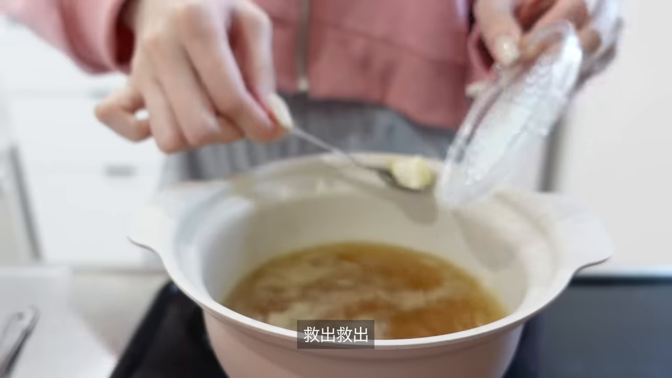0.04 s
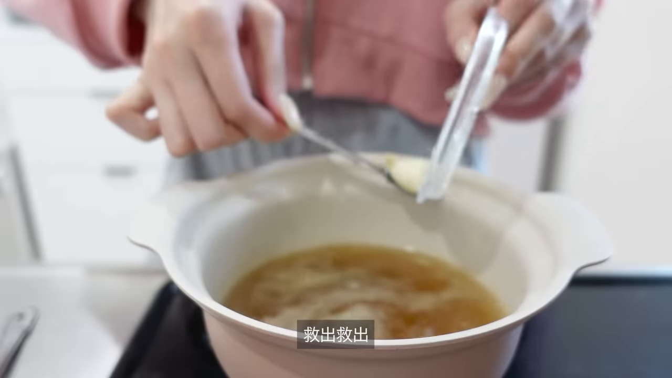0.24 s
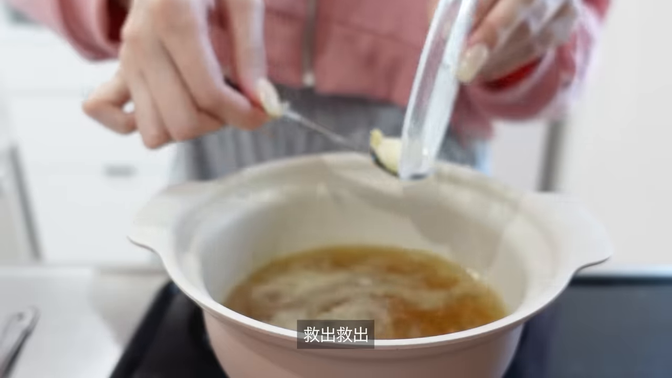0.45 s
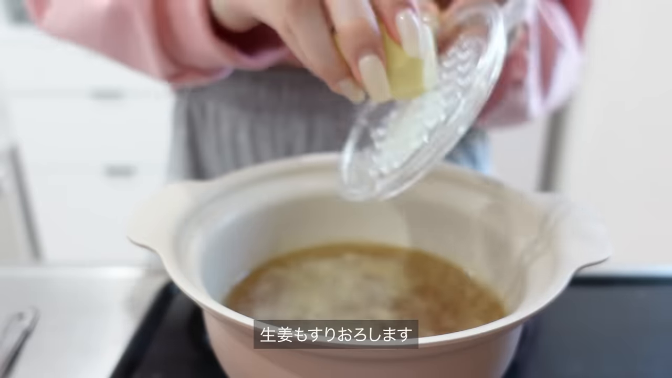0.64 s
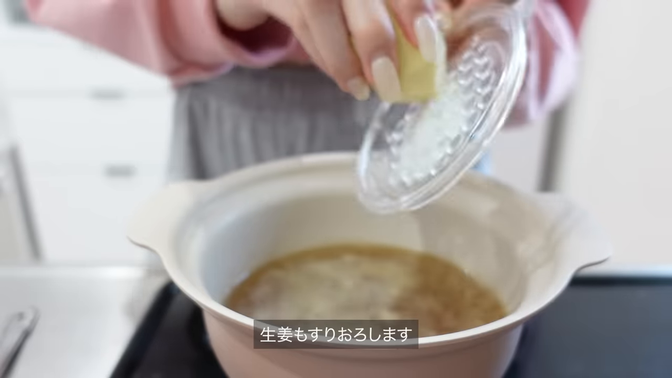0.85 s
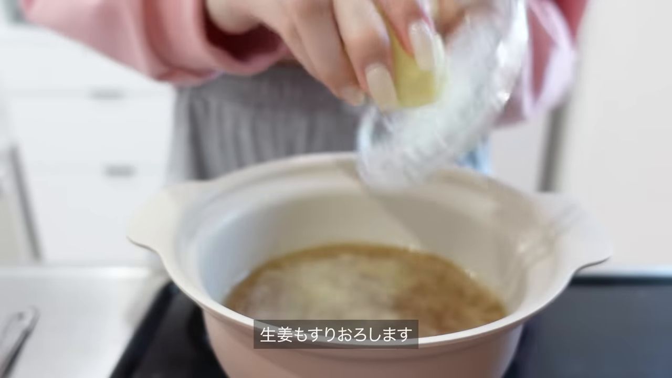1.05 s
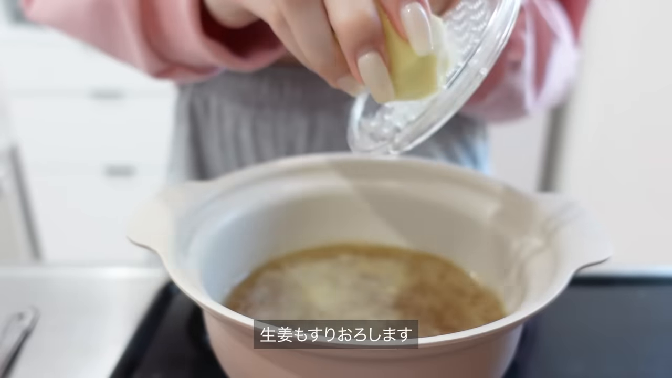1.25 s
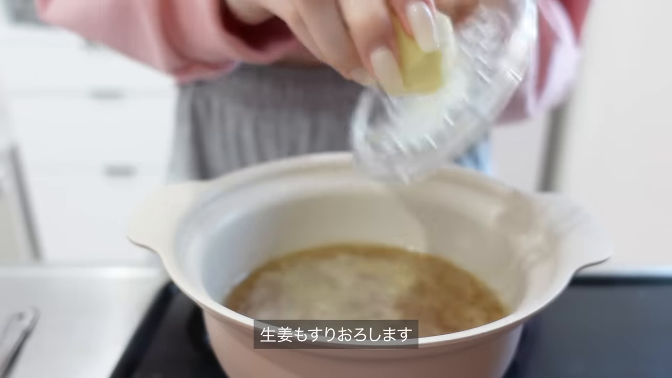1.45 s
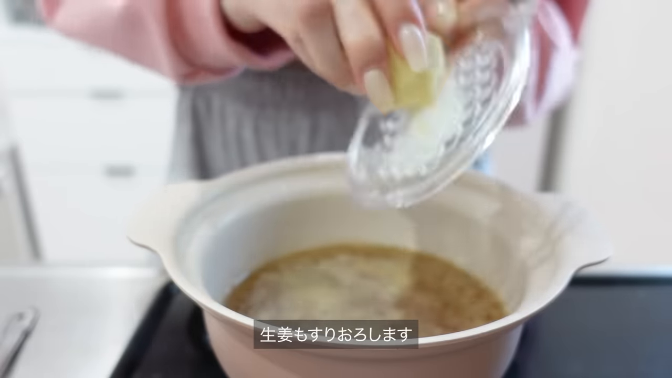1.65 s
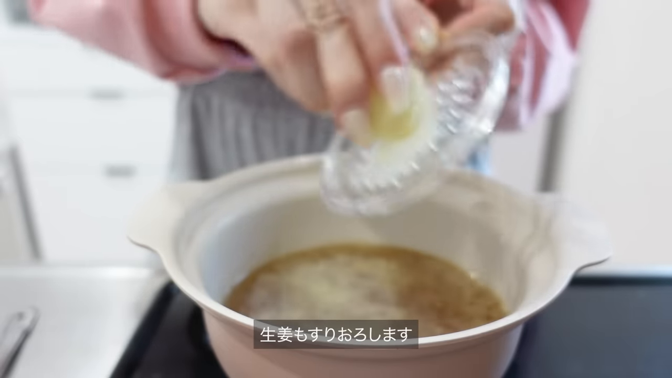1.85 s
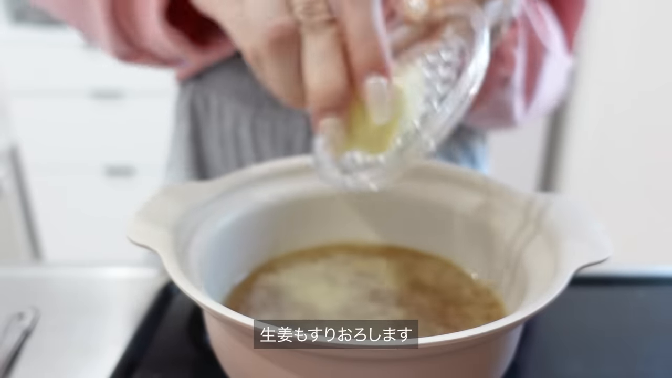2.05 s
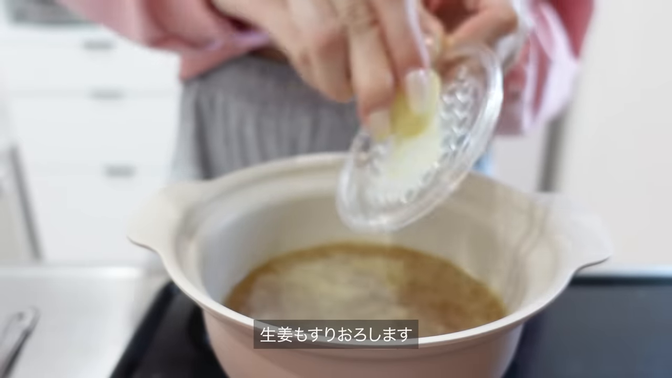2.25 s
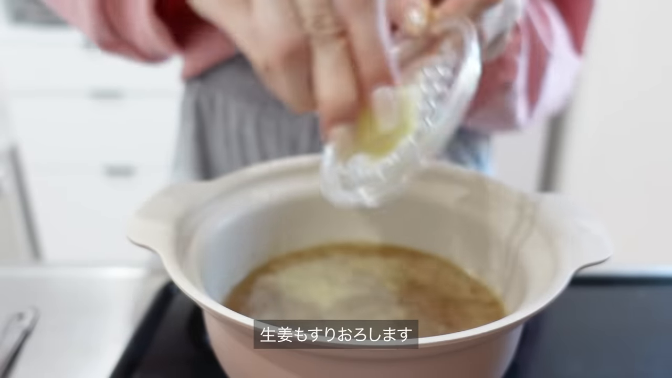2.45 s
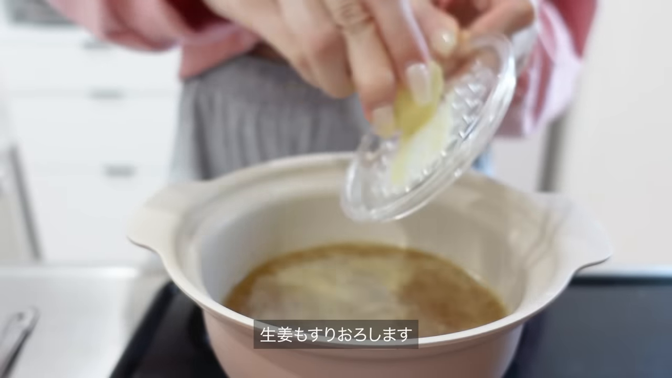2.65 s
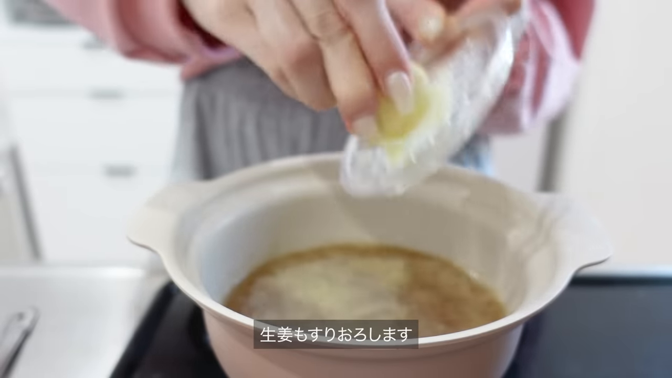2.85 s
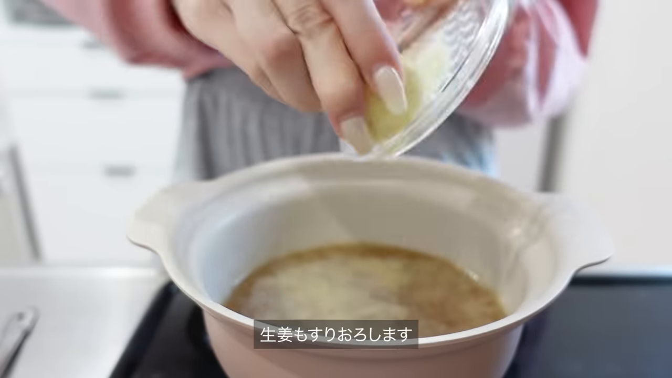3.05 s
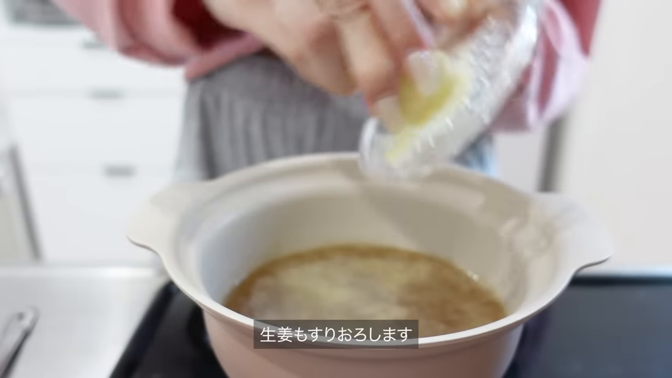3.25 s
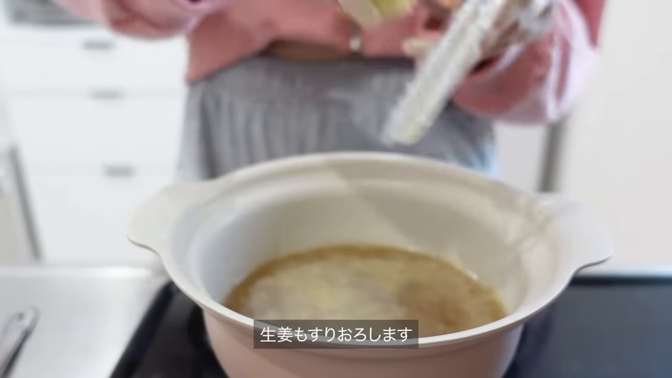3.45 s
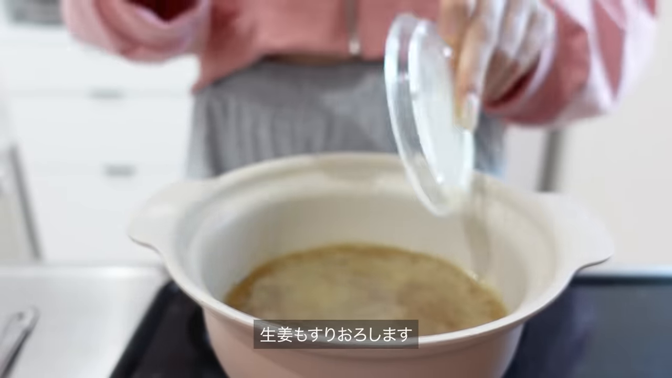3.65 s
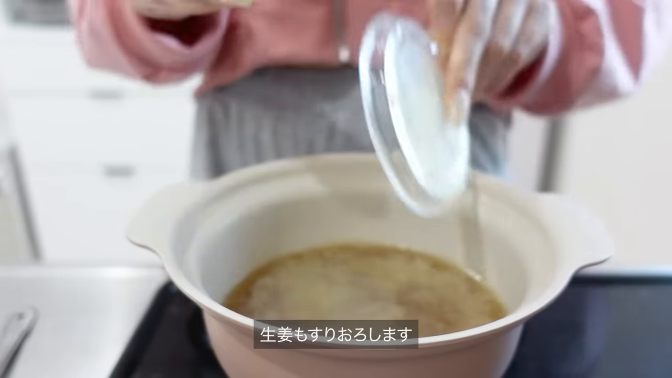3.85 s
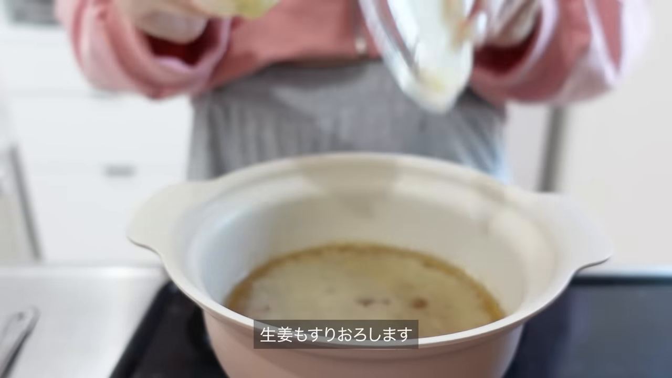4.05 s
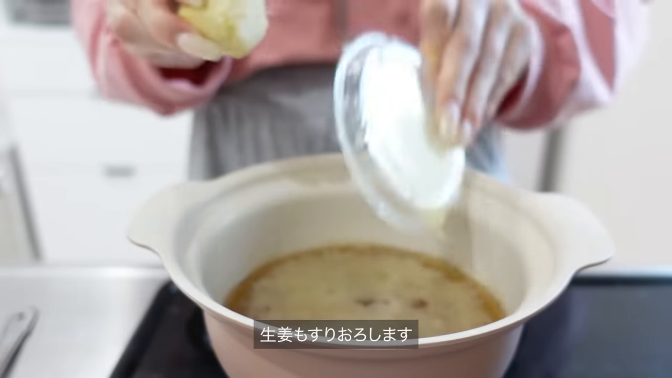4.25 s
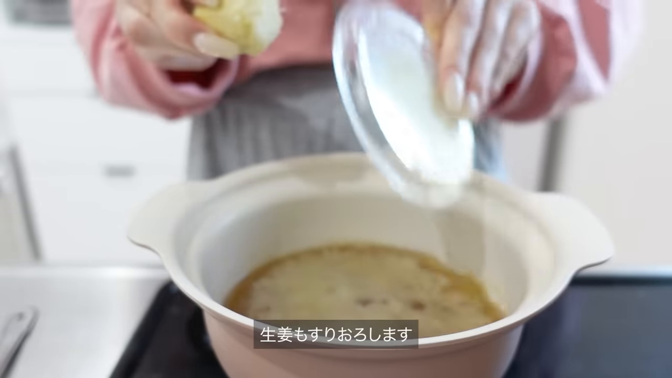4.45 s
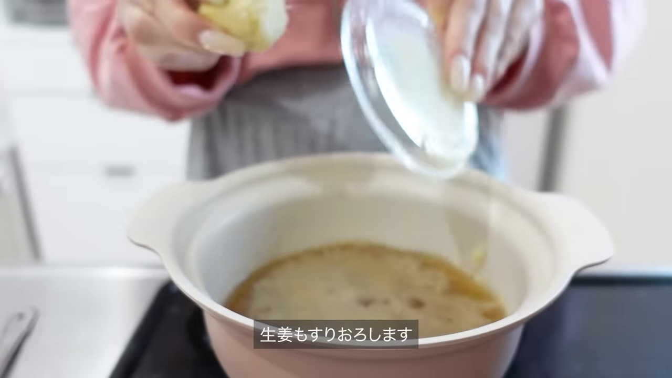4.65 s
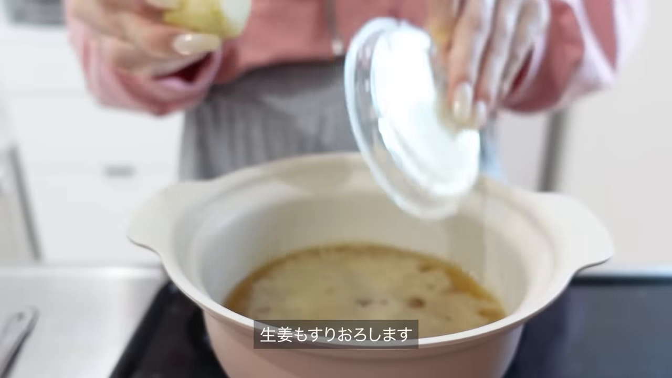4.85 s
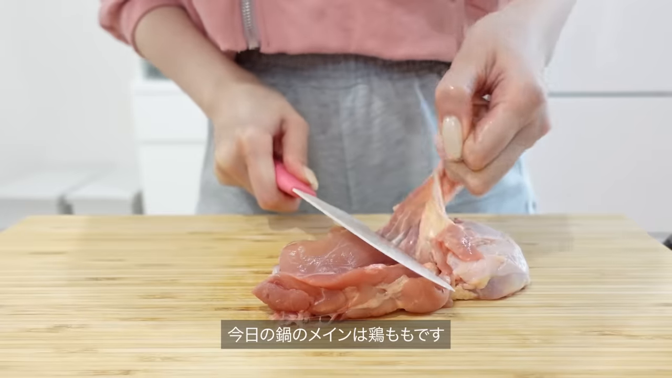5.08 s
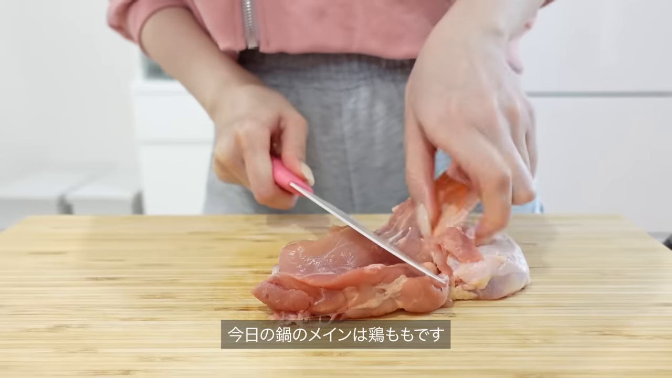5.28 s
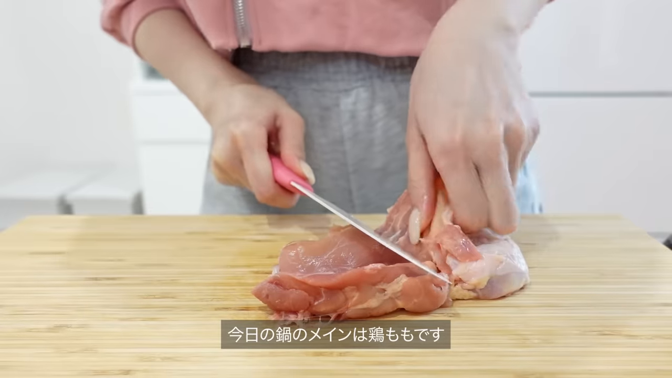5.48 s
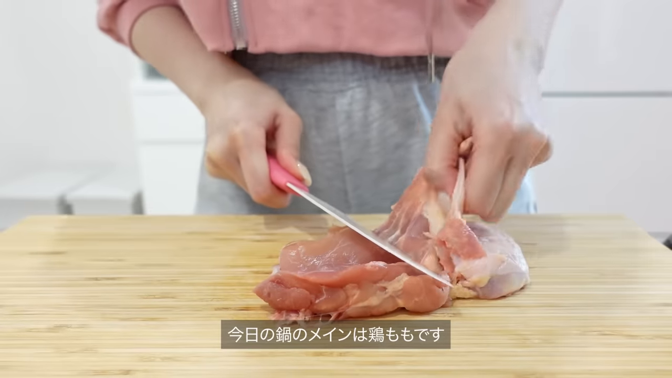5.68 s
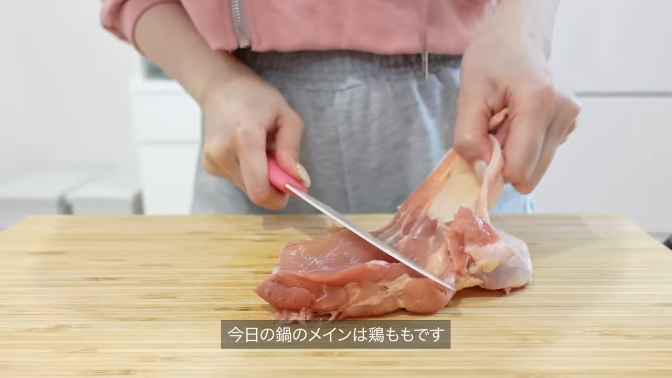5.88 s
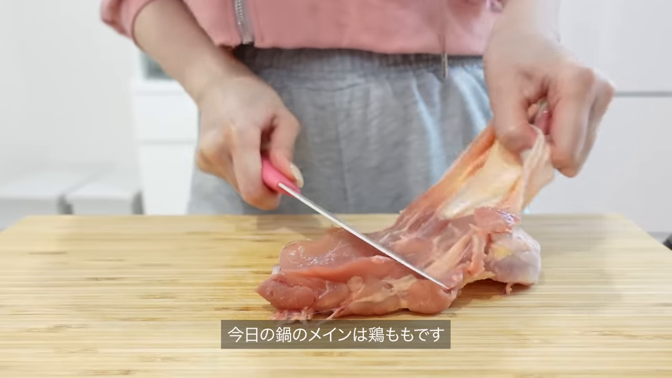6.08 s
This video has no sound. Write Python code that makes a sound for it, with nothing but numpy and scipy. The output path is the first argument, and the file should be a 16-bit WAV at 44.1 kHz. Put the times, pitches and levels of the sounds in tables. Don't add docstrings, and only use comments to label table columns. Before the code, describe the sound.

A spoon scrapes glass, then ginger rasps in quick strokes on a ribbed glass grater, ringing knocks hit a ceramic pot, and raw meat faintly crackles.

```python
import sys
import numpy as np
from scipy import signal
from scipy.fft import rfft, irfft
from scipy.io import wavfile
from scipy.ndimage import uniform_filter1d

SR = 44100
rng = np.random.default_rng(int(sys.argv[2]) if len(sys.argv) > 2 else 0)


def generate_wav(signal):
    frames = np.transpose(np.atleast_2d(signal))
    scaled = np.clip(frames, -1, 1) * 32767
    pcm = np.round(scaled).astype(np.int16)
    wavfile.write(sys.argv[1], SR, pcm)


def voltage_ratio(level):
    return 10 ** (np.asarray(level, float) / 20)


N = 269886
T = np.arange(N) / SR
NORMAL, FAST = 1, 1.771


def evened(x):
    return x / np.sqrt(np.mean(x ** 2) + 1e-20)


def read(points, hz):
    f, value = np.transpose(points)
    return np.interp(np.log(hz + 1), np.log(f + 1), value)


def smooth_noise(*sizes):
    x = rng.standard_normal(N)
    for size in sizes:
        x = uniform_filter1d(x, size=size)
    return evened(x)


def highpass(x, order, hz):
    return signal.sosfilt(signal.butter(order, hz, "high", fs=SR, output="sos"), x)


CUTS_S = [0, .7025, 1.942, 4.074, 4.94, 6.2]


def shot(index, fade_s=0.00058):
    inside_s = np.minimum(T - CUTS_S[index], CUTS_S[index + 1] - T)
    return np.clip(inside_s / fade_s + (index == 0), 0, 1)


def colour(x, db_at, size):
    overlap = size * 3 // 4
    hz, t, z = signal.stft(x, SR, nperseg=size, noverlap=overlap)
    z = z * voltage_ratio(db_at(hz[:, None], t))
    return signal.istft(z, SR, nperseg=size, noverlap=overlap)[1][..., :x.shape[-1]]


def grit(shape, per_s, spread_db, smooth):
    size = voltage_ratio(spread_db * np.minimum(rng.exponential(1, shape), 2.5))
    clicks = size * rng.choice([-1., 1.], shape) * (rng.random(shape) < per_s / SR)
    return evened(evened(clicks) + smooth * rng.standard_normal(shape))


def resonate(x, hz, width_hz):
    turn = np.exp(2j * np.pi * np.cumsum(hz * np.ones(x.shape[-1])) / SR)
    r = np.exp(-np.pi * width_hz / SR)
    return 2 * (turn * signal.lfilter([1 - r], [1, -r], x / turn)).real


def pair(left, other, lean_db):
    return np.array([left + other, left - other]) * voltage_ratio(np.array([[-lean_db], [lean_db]]) / 2)


def narrow(x, hz):
    mid = (x[0] + x[1]) / 2
    side = signal.lfilter(*signal.butter(1, hz, "high", fs=SR), (x[0] - x[1]) / 2)
    return np.array([mid + side, mid - side])


def room(x, t60_s, wet_db):
    t = np.arange(SR // 2) / SR
    noise = rng.standard_normal((2, len(t)))
    tail = colour(noise, lambda hz, s: -60 * s / t60_s * (1 + hz / 14000), size=256)
    tail *= t > .004
    tail = tail / np.linalg.norm(tail[0])
    return voltage_ratio(wet_db) * signal.fftconvolve(x[None], tail, axes=1)[:, :N]


def swells(t, rows, rest_db):
    return voltage_ratio(rest_db) + sum(voltage_ratio(db) * np.exp(-((t - s) / half) ** 2) for s, db, half, *_ in rows)


def contacts(rows, width_share, snap):
    out, t = np.zeros(N), T[:3000]
    for s, db, hz, t60_s in rows:
        noise = rng.standard_normal(len(t))
        ring = evened(resonate(noise, hz, width_share * hz)) * voltage_ratio(-60 * t / max(t60_s, .003))
        pop = 4 * np.sin(2 * np.pi * hz * t)
        burst = (np.diff(noise, prepend=0) + pop) * np.exp(-t / 0.00061)
        part = out[round(s * SR):][:len(t)]
        part += (voltage_ratio(db - 8.0) * (ring + snap * burst))[:len(part)]
    return out


# (frequency [Hz], density [dB per Hz])
TONES = [
    [(24, -57), (40, -31), (177, -13), (438, -16.5), (497, -15.5), (673, -15.5), (981, -18.5),
     (2200, -21.5), (16500, -40.5)],
    [(24, -57.5), (40, -49), (145, -1.5), (271, -6.5), (417, -3.5), (1090, -6.5), (9480, -7),
     (15300, -20.5), (16500, -45)],
    [(24, -56.5), (40, -30), (156, -10), (461, -15), (564, -14.5), (1940, -22.5), (2970, -22), (13500, -62),
     (16500, -53)],
]
TONE_DB = [-60.5, -59, -52, -62]
# (frequency [Hz], correlation [0-1])
TONE_SAME = [(60, 0.93), (240, 0.84), (950, 0.1), (3770, 0.45), (15000, 1)]
# (frequency [Hz], width [Hz], level [dB])
WHINES = [(2110, 64, -77.5), (2600, 30, -80)]
HUM_ON_S, HUM_OFF_S, HUM_SWELL_S = 5.17, 5.92, 0.056
HUM_DB, HUM_BEFORE_DB, HUM_AFTER_DB, UPPER_HUM_DB = -64.5, -77, -70, -70


def room_tone():
    hz, out = np.fft.rfftfreq(N, 1 / SR), 0
    same = np.clip(read(TONE_SAME, hz), -1, 1)
    takes = [(TONES[0], NORMAL, [0, 1]), (TONES[0], FAST, [2]), (TONES[1], NORMAL, [3]), (TONES[2], NORMAL, [4])]
    for (tone, speed, shots), db in zip(takes, TONE_DB):
        a, b = rfft(rng.standard_normal((2, N)))
        z = np.array([a, same * a + np.sqrt(1 - same ** 2) * b]) * voltage_ratio(read(tone, hz / speed))
        z = z / (1 + (80 * (speed - 1) * 1.9 / (hz + 1)) ** 4)
        out = out + voltage_ratio(db) * evened(irfft(z, N)) * sum(shot(k) for k in shots)
    corners_s = [HUM_ON_S - HUM_SWELL_S, HUM_ON_S + HUM_SWELL_S,
                 HUM_OFF_S - HUM_SWELL_S / 2, HUM_OFF_S + HUM_SWELL_S / 2]
    low_db = np.interp(T, corners_s, [HUM_BEFORE_DB, HUM_DB, HUM_DB, HUM_AFTER_DB])
    low_hz = 146 + 1.75 * smooth_noise(1800)
    low = np.sqrt(2) * np.sin(2 * np.pi * np.cumsum(low_hz) / SR) * voltage_ratio(2.0 * smooth_noise(1500))
    upper = evened(resonate(rng.standard_normal(N), 326.5, 13.0))
    hum = voltage_ratio(low_db) * low + voltage_ratio(UPPER_HUM_DB) * upper
    for f, width_hz, db in WHINES:
        hum = hum + voltage_ratio(db) * evened(resonate(resonate(rng.standard_normal(N), f, width_hz), f, 300))
    return out + hum * shot(4)


# (centre [s], scrape [dB], half length [s])
SPOON = [
    (0.104, -58, 0.019),
    (0.278, -48, 0.02),
    (0.336, -61, 0.012),
]
RING_HZ = [
    [604, 2184, 255, 480],
    [3277, 3555, 3660],
    [3882],
    [5300, 5479, 5020, 4673, 4813, 5910, 7030, 7456, 8339, 9125, 9380, 10400, 11280, 4763, 6717, 8172],
]
# (t60 [s], slow knock [dB], fast knock [dB], spoon [dB])
RINGS = [
    [(0.092, 1.5, -1, -9), (0.14, -1.5, -12, 4), (0.11, -6, -7, -2.5), (0.1, -7, -5.5, -16)],
    [(.19, -1, -6, -19), (.5, -3, -11.5, -7), (.5, -4.5, -3, 1.5)],
    [(1.1, -0.5, -2.5, -4)],
    [(0.21, 1.5, -3.5, -11), (0.5, -12, -40, -1.5), (0.36, -15, -5, -11), (0.25, -16.5, -10, 0),
     (0.22, -12, -6, -3), (0.28, -23, -22, -5), (0.12, -9.5, -25, 2), (0.23, -17, -9.5, 1.5),
     (0.15, -15, -18, -7), (0.18, -11, -42.5, -6), (0.11, -10.5, -40, -12), (0.113, -16, -50, -9),
     (0.1, -14, -50, -24), (0.2, -21, -9, -30), (.2, -29.5, -18, -30), (.08, -22.5, -13, -30)],
]
SPOON_REST_DB, SPOON_LIFT_S, THUMP_DB = -60.5, 0.405, -4.5


def spoon():
    t = T[:SR // 2]
    drive = grit(len(t), 1900, spread_db=-2.0, smooth=1.9)
    drift = evened(uniform_filter1d(rng.standard_normal(len(t)), size=2500))
    bend = 1 + 0.003 * drift
    sing = 0
    for (t60_s, _, _, db), hz in zip(sum(RINGS, []), sum(RING_HZ, [])):
        sing = sing + voltage_ratio(db) * evened(resonate(resonate(drive, hz * bend, 22 / t60_s), hz, 550))
    hiss = evened(resonate(resonate(resonate(drive, 5000, 7000), 4800, 7000), 5000, 7000))
    scrape = evened(evened(sing) + 0.087 * hiss)
    thump = evened(resonate(resonate(rng.standard_normal(len(t)), 400, 730), 250, 680))
    thump = highpass(thump, 2, 110)
    old_tap = voltage_ratio(-55 - 60 * t / 0.3) * np.sin(2 * np.pi * RING_HZ[2][0] * t)
    lift = np.clip((SPOON_LIFT_S - t) / 0.061, 0, 1)
    sound = lift * swells(t, SPOON, SPOON_REST_DB) * (scrape + voltage_ratio(THUMP_DB) * thump) + old_tap
    return np.pad(sound, (0, N - len(t)))


# (time [s], peak [dB], frequency [Hz], t60 [s])
TICKS = [(.329, -38.5, 3690, 0.052), (.33, -37, 2590, 0.032), (.329, -35, 6260, 0.041),
         (.329, -37.5, 9000, 0.038), (.333, -40, 4830, 0.018), (3.994, -57, 12000, .01),
         (4.0294, -45, 12060, .01), (4.045, -29, 14300, 0.017), (4.045, -39, 9150, 0.018)]


def taps():
    return highpass(contacts(TICKS, 0.045, snap=0.49), 2, 2200)


# (frequency [Hz], density [dB per Hz])
RASP = [
    [(59, -57), (100, -29), (251, -12), (486, -20), (602, -20), (1150, -24.5), (1330, -11.5), (1680, 2.5),
     (2360, -3), (2570, -4), (2920, -1.5), (4290, 0.5), (5320, -6.5), (7170, -3), (14800, -7.5),
     (16200, -20.5)],
    [(59, -78), (100, -57), (240, -45), (267, -7.5), (304, -52), (466, -7.5), (847, -21.5), (1070, -14),
     (1990, -20), (2430, -13.5), (2680, 1), (3700, -0.5), (4290, -3.5), (5920, 1.5), (15100, -6),
     (16200, -14.5)],
]
# (frequency [Hz], width [Hz], level [dB])
PLATE = [
    [(623, 140, -10), (1580, 420, -32), (2580, 39, 9.5), (3400, 110, -4), (6100, 150, 6), (7100, 64, 7),
     (9000, 230, 2)],
    [(1006, 90, -15), (3170, 130, 0.5), (3760, 190, 4.5), (4610, 79, 8), (5530, 87, -11), (11100, 830, 2),
     (15600, 290, 10)],
]
GAP_SHARE = 0.55
LIGHT_IS_BRIGHT = 0.81
BARE_HZ, BARE_WIDTH_HZ, BARE_FADE_S = 2580, 70, 0.33
BARE_LOW_HZ, BARE_LOW_WIDTH_HZ, BARE_LOW_DB = 1490, 190, -5
BODY_SPREAD_DB, BODY_LAG_S = 3, 0.011


def grating(strokes, stroke_s, lean_db, index, speed, edge_db, square, lumps_db, patchy_db, tone_db,
            wet_db, drag_db, bare_db):
    rasp, plate = RASP[index - 1], PLATE[index - 1]
    s, db, hz = np.transpose(strokes)
    gap_s = np.minimum(np.diff(s, append=2 * s[-1] - s[-2]), 1.19 * np.max(stroke_s))
    contact_s = stroke_s + GAP_SHARE * (gap_s - gap_s.mean())
    bright_db = -LIGHT_IS_BRIGHT * db
    turns_s = (s[1:] + s[:-1] + contact_s[:-1]) / 2
    which = np.clip(np.searchsorted(turns_s, T), 0, len(s) - 1)
    u = 2 * (T - s[which]) / contact_s[which] - 1
    early = u < 0
    fall = np.minimum(abs(u) + 0.033 * early, 3) ** (square + 1.36 * early)
    level_db = db[which] - edge_db * fall + np.array(lean_db)[which] * np.clip(u, -1, 1)
    lumps = smooth_noise(round(160 / speed), 60)
    drive = grit((2, N), 5000 * speed, spread_db=3.2, smooth=1.25) * voltage_ratio(lumps_db * lumps)

    def gain(f, t):
        k = which[np.minimum((t * SR).astype(int), N - 1)]
        modes = sum(voltage_ratio(2 * top_db) / (1 + (2 * (f - at) / width) ** 2) for at, width, top_db in plate)
        patches = uniform_filter1d(rng.standard_normal((len(f), len(t))), size=3, axis=0)
        patches = evened(uniform_filter1d(patches, size=6, axis=1))
        octaves = np.clip(np.log2((f + 1) / (4500 * np.sqrt(speed))), -1, 1)
        tilt = (bright_db[k] - bright_db.mean()) * octaves * 0.35
        rib = tone_db / (1 + ((f - hz[k]) / 130) ** 2)
        return read(rasp, f) + 10 * np.log10(1 + 0.96 * modes) + patchy_db * patches + tilt + rib

    drag = voltage_ratio(db.mean() + drag_db) * (T < s[-1] + contact_s[-1])
    scale = 1 / np.std(colour(drive[0], gain, size=512))
    near, other = scale * colour(drive * np.hypot(voltage_ratio(level_db), drag), gain, size=512)

    bare_fade = np.exp(-np.maximum(T - s[0], 0) / BARE_FADE_S)
    bare = voltage_ratio(bare_db + level_db) * bare_fade * evened(drive[1])
    bare_hz, low_hz = BARE_HZ * speed, BARE_LOW_HZ * speed
    near = near + resonate(resonate(bare, bare_hz, BARE_WIDTH_HZ), bare_hz, 300)
    low = resonate(resonate(bare, low_hz, BARE_LOW_WIDTH_HZ), low_hz, BARE_LOW_WIDTH_HZ)
    near = near + voltage_ratio(BARE_LOW_DB) * low

    level_db = np.interp(T - BODY_LAG_S / speed, T, level_db)
    spread_db = BODY_SPREAD_DB * (2 * rng.random(len(s)) - 1.1)
    pushes = evened(drive[0]) * voltage_ratio(level_db + spread_db[which])
    body_hz = RING_HZ[0][0] * speed
    near = near + 0.73 * resonate(resonate(pushes, body_hz, 60 * speed), body_hz, 110 * speed ** 2)
    upper = evened(drive[1]) * voltage_ratio(level_db)
    near = near + 0.6 * resonate(resonate(upper, 735 * speed, 54), 735 * speed, 110)
    return (pair(near, 0.13 * other, 2.0) + room(near, 0.3 / speed, wet_db)) * shot(index)


# (start [s], pressure [dB], loudest rib tone [Hz])
SLOW_STROKES = [(0.664, -35.5, 2700), (0.756, -32, 2650), (0.842, -31.5, 2580), (0.924, -29.5, 1580),
                (1.002, -29, 1990), (1.085, -30, 3400), (1.167, -27.5, 2580), (1.254, -29.5, 1910),
                (1.328, -30, 2660), (1.408, -31, 2580), (1.486, -29, 4390), (1.563, -30.5, 3400),
                (1.644, -29, 1830), (1.726, -30, 3200), (1.802, -32, 2310), (1.886, -29, 3640)]
SLOW_STROKE_S = [0.057, 0.058, 0.063, 0.067, 0.055, 0.061, 0.059, 0.06, 0.05, 0.054, 0.054, 0.056, 0.054,
                 0.059, 0.061, 0.053]
SLOW_LEAN_DB = [-3.5, -0.2, -6, -7, -0.5, -0.5, 0, -4, 1.5, 3.5, -2.5, 0, 0, -2.5, 0, -3.5]


def slow_grating():
    return grating(SLOW_STROKES, np.array(SLOW_STROKE_S), SLOW_LEAN_DB, index=1, speed=NORMAL,
                   edge_db=8.5, square=2.4, lumps_db=1.0, patchy_db=2.6, tone_db=5.0,
                   wet_db=-12.5, drag_db=-20.5, bare_db=15)


# (time [s], peak [dB], frequency [Hz])
SNAPS = [(0.7594, -23, 2570), (0.8496, -28, 3090), (0.8502, -25, 2530), (0.927, -22, 2670),
         (1.011, -28, 7170), (1.093, -8, 3400), (1.173, -34, 2520), (1.257, -20, 3780), (1.2657, -13, 3580),
         (1.2704, -11, 7100), (1.331, -9.5, 7040), (1.416, -13, 3460), (1.4957, -25, 4240),
         (1.4966, -23, 4270), (1.569, -30, 3430), (1.6474, -20, 4170), (1.7327, -40, 2500),
         (1.733, -31, 3140), (1.8104, -33, 3450), (1.8995, -37, 4210), (1.9002, -25, 3530),
         (2.001, -22, 6340), (2.04, -35, 3710), (2.083, -22, 6660), (2.168, -14, 3100), (2.2465, -34, 6660),
         (2.3278, -44, 6140), (2.4086, -26, 3150), (2.45, -34, 3610), (2.4884, -46, 6380),
         (2.5707, -33, 3330), (2.6147, -24, 3650), (2.6515, -28, 2920), (2.6984, -21, 3850),
         (2.708, -13, 3750), (2.74, -22, 3320), (2.7894, -23.5, 7030), (2.8296, -35, 3900),
         (2.9608, -41, 3370), (3.0083, -23, 3320), (3.095, -28, 2660), (3.1843, -36, 5770),
         (3.23, -30, 3150), (3.3604, -30, 3400), (3.444, -17, 9000)]
SNAP_T60_S, SNAP_DB = 0.025, -9


def fibre_snaps():
    snaps = voltage_ratio(SNAP_DB) * contacts([row + (SNAP_T60_S,) for row in SNAPS], 0.22, snap=0.31)
    return highpass(snaps * shot(1), 2, 2200) + highpass(snaps * shot(2), 8, 3250)


# (start [s], pressure [dB], rib tone [Hz])
EVEN_STROKES = [(1.95, -34.5, 3600), (1.992, -33.5, 6300), (2.036, -34, 3580), (2.078, -35, 6600),
                (2.119, -35.5, 4600), (2.161, -35, 2930), (2.201, -37.5, 6150), (2.244, -34.5, 3540),
                (2.283, -35, 4660), (2.324, -35, 6200), (2.361, -36, 3750), (2.404, -34, 3400),
                (2.445, -36.5, 3760), (2.483, -35.5, 3400), (2.521, -37, 2980), (2.564, -36, 3630)]
# (start [s], pressure [dB], rib tone [Hz])
JABS = [(2.611, -32, 3720), (2.648, -31.5, 2830), (2.692, -32.5, 3760), (2.737, -35, 3500),
        (2.784, -37.5, 3750), (2.827, -38, 3700), (2.874, -41.5, 5700)]
# (start [s], pressure [dB], rib tone [Hz])
LATE_STROKES = [(2.91, -40.5, 3700), (2.96, -36, 3400), (3.001, -35, 3180), (3.05, -36.5, 5700),
                (3.09, -35, 6100), (3.132, -37.5, 2950), (3.178, -34.5, 5700), (3.225, -35, 3300),
                (3.263, -39, 4850), (3.311, -36, 5700), (3.353, -37, 3400), (3.397, -37, 4660),
                (3.44, -38, 5530)]
EVEN_LEAN_DB = [-3, -3.5, -3.5, -1, -3, -5.5, -3, -8.5, -4, -6.5, -3, -7, -4, -8.5, -1, -7]
JAB_LEAN_DB = [-2, -9.5, 1, -4.5, -7.5, -6, -5.5]
LATE_LEAN_DB = [-9, -11.5, -9.5, -1.5, -5.5, -1, -1.5, -6, 0, -3.5, -5, -4, -7]
EVEN_S, JAB_S, LATE_S = 0.036, 0.028, 0.038


def fast_grating():
    strokes = EVEN_STROKES + JABS + LATE_STROKES
    lean_db = EVEN_LEAN_DB + JAB_LEAN_DB + LATE_LEAN_DB
    contact_s = np.repeat([EVEN_S, JAB_S, LATE_S], [len(EVEN_STROKES), len(JABS), len(LATE_STROKES)])
    return grating(strokes, contact_s, lean_db, index=2, speed=FAST,
                   edge_db=12.5, square=2.76, lumps_db=1.5, patchy_db=2.8, tone_db=6.0,
                   wet_db=-11.5, drag_db=-15, bare_db=-20)


# (centre [s], rustle [dB], half length [s], centre frequency [Hz])
RUSTLE = [
    [(3.555, -53, 0.072, 5960)],
    [(4.96, -64, 0.12, 5200), (5.11, -59, 0.022, 4630), (5.29, -64.5, 0.063, 7540),
     (5.83, -64.5, 0.055, 6100), (5.94, -71, 0.031, 8200), (6.07, -65, 0.082, 7200)],
    [(3.56, -52.5, 0.078, 11700)],
    [(5.054, -67, .045, 3550)],
]
RUSTLE_REST_DB = [-66, -69.5, -85, -96.5]
# (from [s], to [s])
RUSTLE_SPANS = [(3.49, 3.64), (4.94, 6.12), (3.49, 3.64), (4.94, 5.3)]


def rustle():
    out = np.zeros((2, N))
    falls_db, shelves_db = [380, 7, 55, 300], [-10.0, -14, -25, -40]
    clicks_per_s = [3000, 590, 3000, 900]
    for rows, rest_db, (start, end), fall_db, shelf_db, per_s in zip(
            RUSTLE, RUSTLE_REST_DB, RUSTLE_SPANS, falls_db, shelves_db, clicks_per_s):
        s, _, _, hz = np.transpose(rows)

        def band(f, t):
            octaves = np.log2((f + 1) / np.interp(t, s, hz))
            hump = voltage_ratio(-np.minimum(fall_db * octaves ** 2, 60))
            shelf = voltage_ratio(shelf_db) / (1 + (f / 13500) ** 8)
            return 20 * np.log10(hump + shelf) - 20.0 * (f < 3200)

        crackle, other = colour(grit((2, N), per_s, spread_db=5.0, smooth=1.6), band, size=256)
        inside = np.clip(np.minimum(T - start, end - T) / 0.001, 0, 1)
        out += swells(T, rows, rest_db) * inside * pair(crackle, 0.52 * other, 2.5) / np.std(crackle)
    return out


# (frequency [Hz], t60 [s])
CLATTER_T60 = [(100, 0.74), (500, 0.38), (2000, 0.27), (6000, 0.32), (14000, 0.19)]
REBOUND_S, REBOUND_HALF_S = 0.032, 0.017


def chatter(raw, stretch, rebound_db, speed, swell_s):
    def dying(f, u):
        late = 1 - .97 * np.exp(-(u / swell_s) ** 2) / (1 + (f / speed / 1500) ** 2)
        bounce = np.exp(-((u * speed - REBOUND_S * stretch) / REBOUND_HALF_S) ** 2)
        late = late + voltage_ratio(rebound_db) * bounce
        return 20 * np.log10(late) - 60 * u * speed / stretch / read(CLATTER_T60, f / speed)

    rattle, other = colour(raw, dying, size=256)
    return pair(rattle, 0.47 * other, 0.69) / np.std(raw[0])


CLICK_DB, CLICK_S = -20, 0.00033


def first_touch(t, raw, speed, tick_db, spike_db, edge_db):
    tick = evened(raw - uniform_filter1d(raw, size=40)) * np.exp(-t * speed / 0.0027)
    click = rng.standard_normal(len(t)) * np.exp(-t / CLICK_S)
    u = t * speed / .00013 - 3
    push = u * np.exp(-u ** 2 / 2)
    return voltage_ratio(tick_db) * tick + voltage_ratio(CLICK_DB + edge_db) * click + voltage_ratio(spike_db + edge_db) * push


FILL_S = [
    [0.033, 0.015, 0.028, 0.033],
    [0.015, 0.0068, 0.012],
    [.004],
    [.009, .008, .018] + [.002] * 13,
]
PICKED_HZ = [
    [2184],
    [4673, 4813, 4763],
    [7456],
    [9125, 9380, 8172],
]
BEAT_DEPTH = 0.74


def struck_modes(t, left_s, stretch, families_db, thin_db, short_db, spot_db, speed, column, dampings):
    sound = np.zeros((2, len(t)))
    stop = np.clip((left_s - t) / 0.0011 + 1, 0, 1)
    for number, (family, family_hz, fills_s, family_db, damping) in enumerate(
            zip(RINGS, RING_HZ, FILL_S, families_db, dampings)):
        for place, (mode, slow_hz, fill_s) in enumerate(zip(family, family_hz, fills_s)):
            hz, build_s, t60_s = slow_hz * speed, fill_s / speed, mode[0]
            turn, side, split, spot = rng.random(4)
            db = family_db + mode[column]
            db += sum(gain_db for gain_db, group in zip(spot_db, PICKED_HZ) if slow_hz in group)
            if number == 1 and place == 0:
                db += short_db
            if number == 3 and place > 1:
                db += thin_db
            if len(family) > 1:
                db += 2.9 * (spot - 1.0)
            depth = BEAT_DEPTH * min(0.086 / t60_s, 1) * (slow_hz > 700)
            twin = 1 + depth * np.cos(2 * np.pi * (speed * (12 + 25 * split) * t + side))
            ear_turn = np.array([[0], [.25]]) * (split - .5)
            wave = np.sin(2 * np.pi * (hz * t + turn + ear_turn)) * twin * (hz < 16500)
            decay_db = 60 * np.maximum(t - build_s, 0) * speed / t60_s / stretch * damping
            wave *= voltage_ratio(db - decay_db) * (1 - np.exp(-(t / build_s) ** 2))
            sound += wave * stop * voltage_ratio(np.array([[-4.0], [4.0]]) * (side - 0.17))
    return sound


# (frequency [Hz], density [dB per Hz])
CLATTER = [
    [(24, -68.5), (40, -25), (578, -9.5), (782, -13), (1400, -14), (2200, -12.5), (2970, -23), (3640, -17),
     (4560, -20), (5440, -14), (6020, -21), (9240, -18.5), (14900, -27.5), (17000, -52)],
    [(24, -65), (40, -24.5), (396, -7.5), (1060, -2.5), (1430, -7.5), (3830, -8.5), (5440, -13.5),
     (6660, -16), (7560, -13), (9240, -13.5), (13500, -11), (15300, -12.5), (17000, -31.5)],
]


def knocks(rows, edges_db, spots_db, reach_db, index, speed, column, ring_db, clatter_db, swell_s,
           tick_db, comb_db, grip, hold, spike_db):
    out = np.zeros((2, N))
    ends_s = [row[0] for row in rows[1:]] + [CUTS_S[index + 1]]
    comb = rng.standard_normal(513)
    t = T[:round(SR / 2.5 / speed)]
    for row, end_s, reach, spot_db, edge_db in zip(rows, ends_s, reach_db, spots_db, edges_db):
        s, blow_db, top_db, long_db, stretch = row
        body_db, middle_db, thin_db, rebound_db, short_db = reach
        peaks = evened(uniform_filter1d(comb + 3.5 * rng.standard_normal(513), size=2))[:, None]

        def spectrum(f, u):
            return read(CLATTER[column - 1], f) + comb_db * peaks * np.clip(f / 2500 - .4, 0, 1)

        raw = colour(grit((2, len(t)), 2500, spread_db=2.5, smooth=3.3), spectrum, size=1024)
        rattle = chatter(raw, stretch, rebound_db, speed, swell_s) * np.minimum(t / 0.0011, 1)
        sound = voltage_ratio(blow_db + clatter_db) * rattle
        sound += voltage_ratio(blow_db) * first_touch(t, raw[0], speed, tick_db, spike_db, edge_db)
        families_db = np.array([top_db + body_db, top_db + middle_db, long_db, top_db]) + ring_db
        sound += struck_modes(t, end_s - s, stretch, families_db, thin_db, short_db, spot_db,
                              speed, column, dampings=[1, hold, 1, grip])
        at = round(s * SR)
        out[:, at:at + len(t)] += sound
    return highpass(out, 4, 62 * speed) * shot(index)


# (time [s], blow [dB], ring [dB], long mode [dB], chatter time factor [1])
FAST_KNOCKS = [
    (3.6445, -18.5, -32.5, -38.5, 1.1),
    (3.708, -5.5, -16, -28, 1.7),
    (3.775, -5.5, -22.5, -26.5, 1.3),
    (3.837, -3.5, -20, -27, 1.09),
    (3.897, -5, -21, -28, 1.24),
]
# (body [dB], middle [dB], thin partials [dB], rebound [dB], short middle mode [dB])
FAST_REACH = [(-16, -3, 2.5, -6, 1), (-7, -4, -5.5, 1.5, 1.5), (-4, 0.5, 5.5, 5, 3),
              (-4, -3.5, 4.5, -3.5, 3.5), (-8.5, -1, 4, -6, -3)]
# (2.2 kHz [dB], 4.7-4.8 kHz [dB], 7.5 kHz [dB], 9 kHz pair or 8 kHz [dB])
FAST_SPOTS = [(-3, 0.1, 7, 0.1), (-3, 0.1, 1, 7), (3, 0.5, -2, -3), (-6, -2.5, -5, -2), (6, 0.1, -0.5, 0)]
FAST_EDGE_DB = [13, 6, 2, 5, 6]


def fast_knocks():
    return knocks(FAST_KNOCKS, FAST_EDGE_DB, FAST_SPOTS, FAST_REACH, index=2, speed=FAST, column=2,
                  ring_db=6.0, clatter_db=-20.0, swell_s=0.0022, tick_db=-20.5, comb_db=1.5,
                  grip=1.72, hold=1.75, spike_db=-9.5)


# (time [s], blow [dB], ring [dB], long mode [dB], chatter time factor [1])
SLOW_KNOCKS = [
    (4.281, -13.5, -24.5, -24.5, 1.87),
    (4.42, -8.5, -18.5, -32.5, 0.95),
    (4.53, -5.5, -20.5, -32.5, 1.28),
    (4.658, -6, -16, -36.5, 1),
    (4.775, -7, -18, -57, 1.084),
]
# (body [dB], middle [dB], thin partials [dB], rebound [dB], short middle mode [dB])
SLOW_REACH = [(-5.5, -4.5, 8, 2, -2), (-8.5, -7, 0, -24, -2.5), (-2.5, -4, 0.5, -3, -0.5),
              (-8, -7.5, -2, -12.5, -5), (-9.5, -6.5, -5, -9, 0)]
# (2.2 kHz [dB], 4.7-4.8 kHz [dB], 7.5 kHz [dB], 9 kHz pair or 8 kHz [dB])
SLOW_SPOTS = [(7.5, 2.5, 0.1, -5), (3.5, -7, 6, -2), (-2.5, 4.3, -2.5, 5.5), (2.3, -2.5, 5.5, -5.5),
              (-1.5, 0.1, -3.7, 2.8)]
SLOW_EDGE_DB = [4, 7, 3, 2, 3]


def slow_knocks():
    return knocks(SLOW_KNOCKS, SLOW_EDGE_DB, SLOW_SPOTS, SLOW_REACH, index=3, speed=NORMAL, column=1,
                  ring_db=5.0, clatter_db=-14.5, swell_s=0.0029, tick_db=-9.0, comb_db=2.5,
                  grip=1.045, hold=1.0, spike_db=-5.5)


# (time [s], peak [dB], frequency [Hz])
SMACKS = [(5.0421, -27.5, 3750), (5.084, -33, 3700), (5.103, -38, 3720), (5.152, -43, 4500),
          (5.2133, -50, 6440), (5.242, -43.5, 6370), (5.262, -41, 8000), (5.269, -39, 6280),
          (5.2847, -35, 9400), (5.292, -35, 6740), (5.3388, -49, 9180), (5.35, -49, 10500),
          (5.367, -48, 9000), (5.4586, -49, 9260), (5.568, -51, 9550), (5.607, -47, 9420),
          (5.8025, -40.5, 5600), (5.819, -40.5, 6400), (5.8744, -51, 8870), (5.909, -45, 5700),
          (5.9332, -42, 12800), (6.019, -44.5, 6260), (6.068, -34.5, 12400), (6.089, -37, 4170)]
SMACK_T60_S = 0.018


def smacks():
    return highpass(contacts([row + (SMACK_T60_S,) for row in SMACKS], 0.33, snap=0.35), 8, 3250)


def scene():
    small = spoon() + taps() + fibre_snaps() + smacks()
    mix = pair(small, 0, 3.7) + room(small, 0.26, -5.0)
    mix += slow_grating() + fast_grating() + rustle()
    mix += fast_knocks() + slow_knocks()
    return narrow(mix, 2800) + room_tone()


def low_pass(x):
    return signal.sosfilt(signal.butter(12, 16970, fs=SR, output="sos"), x)


def record(dry):
    cut = highpass(dry, 4, 62)
    limited = 1.321 * np.tanh(cut / 1.532)
    edge = signal.firwin(2047, 15770, window=("kaiser", 8), fs=SR)[None]
    wider = signal.firwin(2047, 16900, window=("kaiser", 8), fs=SR)
    edge = edge + 0.02 * (wider - edge)
    return low_pass(signal.oaconvolve(limited, edge, "same"))


dry = scene()
out = record(dry)
generate_wav(out)
```